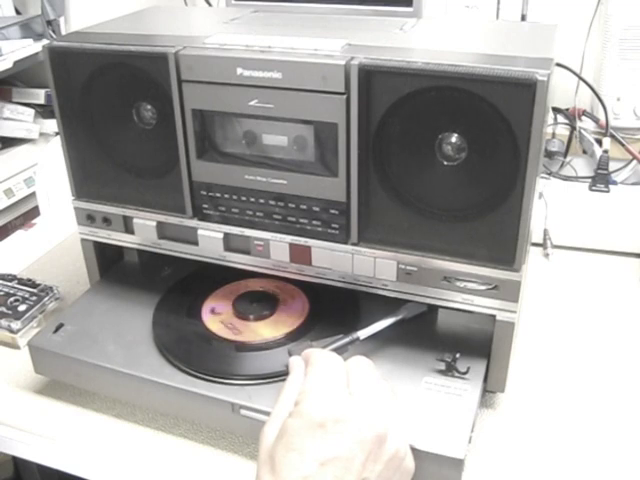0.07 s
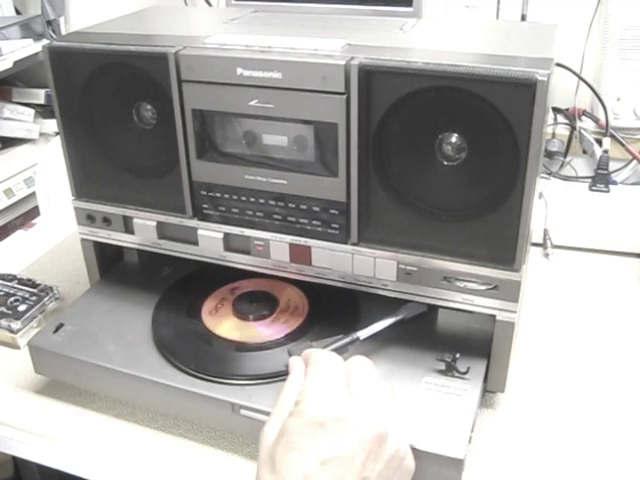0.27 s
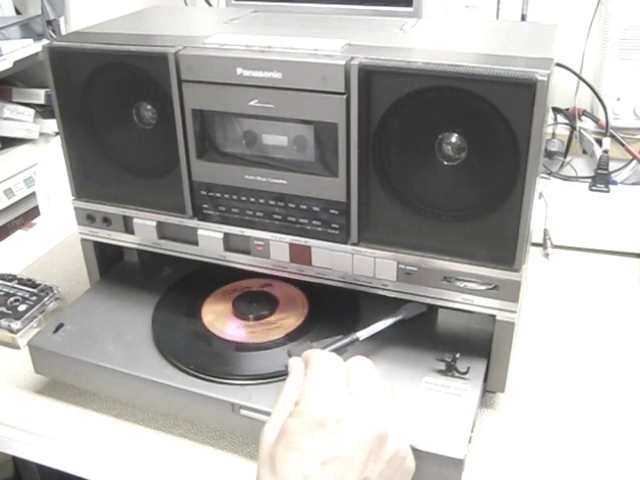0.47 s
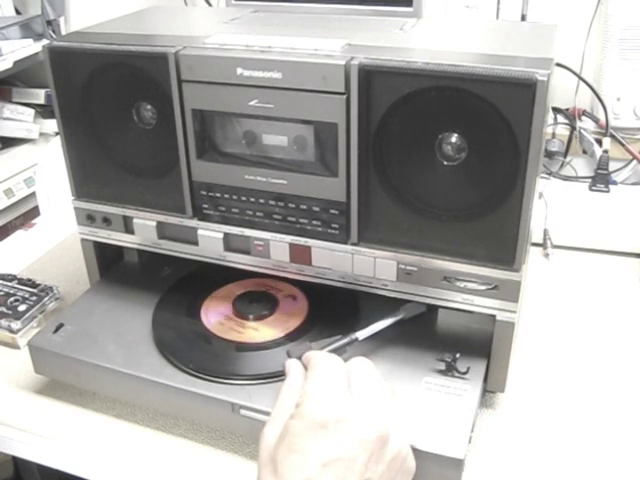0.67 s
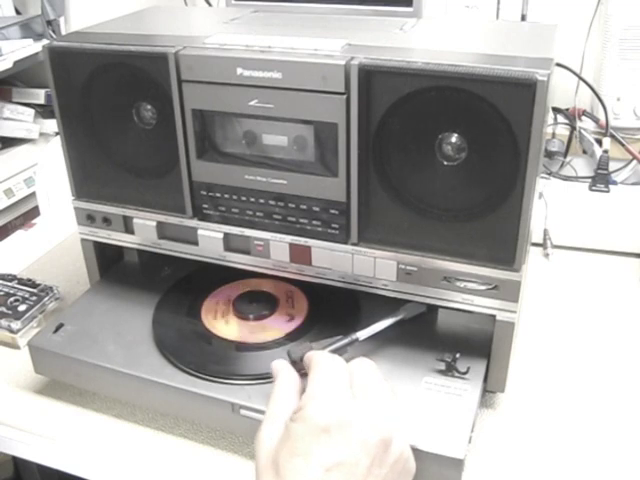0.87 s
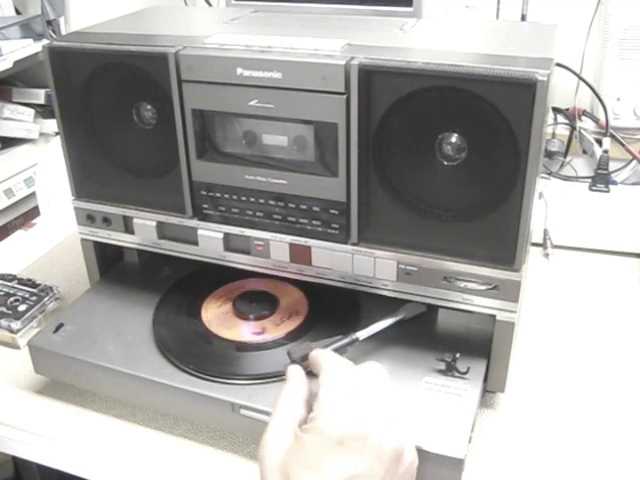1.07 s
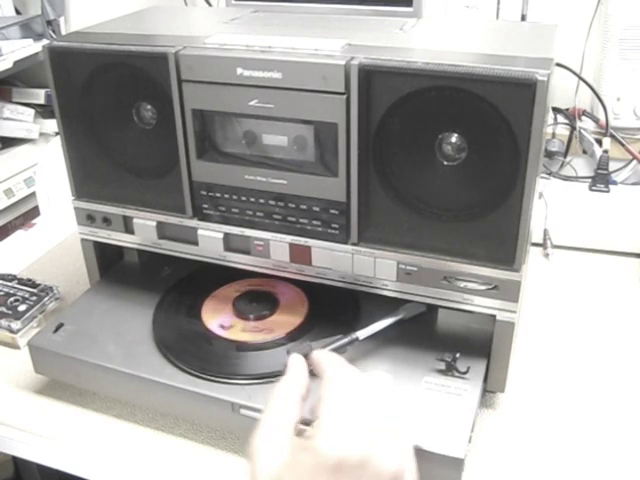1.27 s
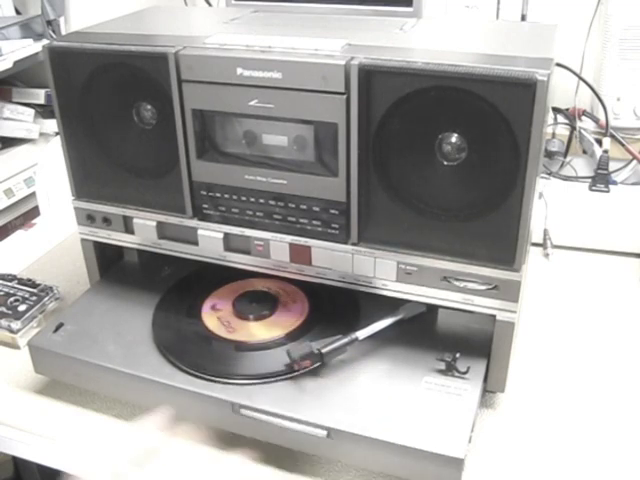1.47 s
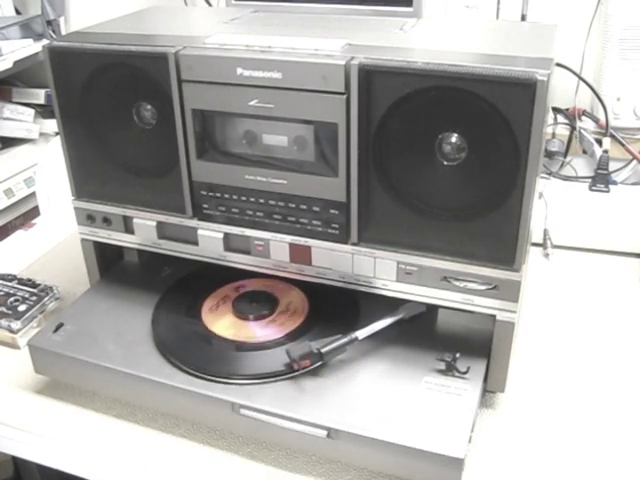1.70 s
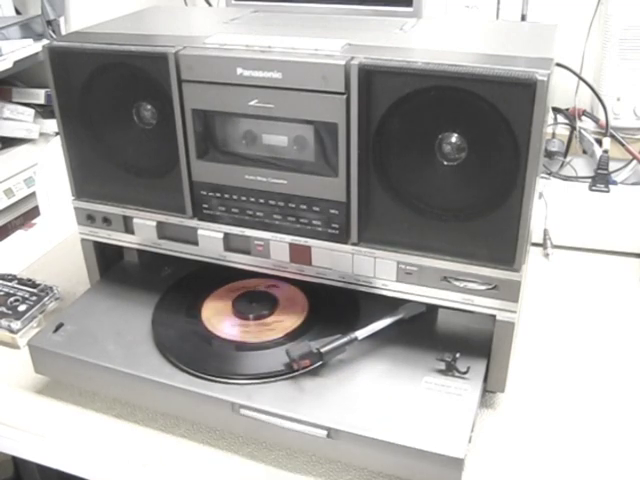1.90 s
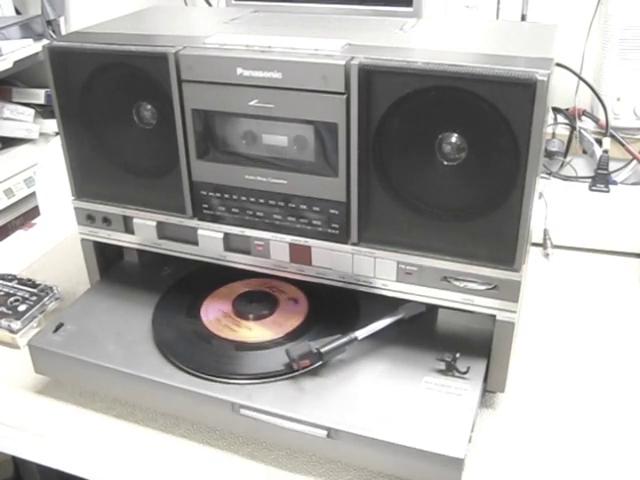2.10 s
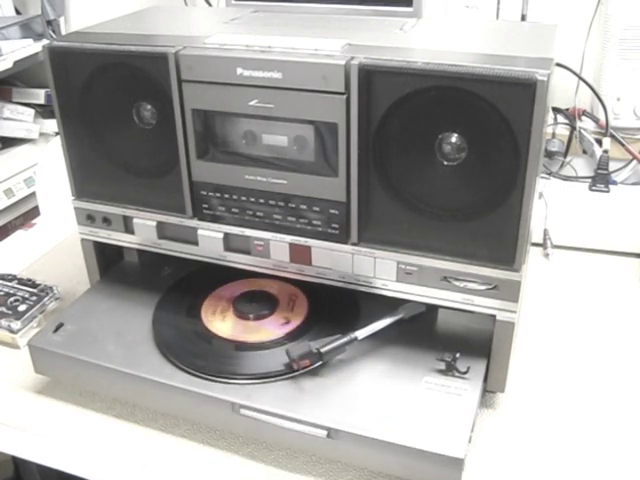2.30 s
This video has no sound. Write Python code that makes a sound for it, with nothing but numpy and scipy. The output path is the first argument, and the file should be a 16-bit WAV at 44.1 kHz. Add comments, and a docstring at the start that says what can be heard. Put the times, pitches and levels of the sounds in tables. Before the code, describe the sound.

A record player's tonearm is handled with short, hollow, raspy scrapes and light knocks, until the needle thumps down. Soft hiss, ticks and two low pops follow over a faint motor whine, heard up close in a small, quiet room.

```python
"""In a small room, fingertips drag along the tonearm of a portable record player. Stick-slip friction
excites the hollow arm, and the pickup passes the scraping to the loudspeaker. The stylus lands with
a thud, the hand lets go, and the lead-in groove hisses and pops. The motor whines faintly throughout,
and the recorder's gain control ducks after the loudest clicks."""
import sys
import numpy as np
from scipy import signal
from scipy.fft import rfft, irfft, next_fast_len
from scipy.io import wavfile
from scipy.ndimage import map_coordinates

SR = 44100
rng = np.random.default_rng(int(sys.argv[2]) if len(sys.argv) > 2 else 0)


def log_audio(samples):
    """Write samples as a 16-bit WAV file to the path given in sys.argv[1]."""
    # one column per channel
    frames = np.atleast_2d(samples).T
    # limit to full scale, then quantise
    limited = np.clip(frames, -1, 1)
    pcm = np.round(limited * 32767).astype(np.int16)
    wavfile.write(sys.argv[1], SR, pcm)


N = 108045
TIME = np.arange(N) / SR

# finger strokes on the arm: start_s, length_s, body_db, rasp_db
FINGER_STROKES = [(0.18, 0.06, -43, -41), (0.249, 0.068, -36, -41.5), (0.302, 0.057, -39.5, -44),
                  (0.363, 0.055, -30, -34.5), (0.39, 0.036, -32.5, -33), (0.427, .13, -31, -35.5),
                  (0.568, 0.045, -30, -36.5), (0.625, 0.019, -28.5, -33), (0.655, 0.064, -34, -40.5),
                  (0.712, 0.051, -29.5, -36), (0.776, 0.013, -27, -34.5), (0.795, 0.13, -42.5, -46),
                  (0.863, 0.1114, -29.5, -32)]
# broad response of the hollow arm: frequency_hz, relative_db
ARM_SPECTRUM = [(65, -54), (110, -30), (156, -22.5), (222, -10.5), (312, -2), (339, -6.5), (376, -8),
                (487, -3), (540, -16.5), (624, -11.5), (744, -1.5), (825, -8), (934, -10), (1030, -38),
                (1300, -38), (1690, -46), (2860, -120)]
# narrow resonances that the rubbing keeps ringing: pitch_hz, width_hz, relative_to_body_db
ARM_RESONANCES = [(331, 15, -11), (746, 6.1, -10.5), (1480, 10.4, -15.5), (2360, 25, -18), (3118, 17, -22)]
# skin friction: frequency_hz, relative_db
RASP_SPECTRUM = [(650, -36), (1100, -3), (1180, -17), (1230, 0), (1410, -9.5), (1520, 1), (1700, -0.5),
                 (2200, -2.5), (2360, -2.5), (2580, -1), (3260, 1), (3650, -5.5), (4360, -7.5), (4830, -16),
                 (5340, -12), (6240, -18), (7900, -15), (10800, -47), (14000, -28.5), (15000, -26),
                 (16000, -56)]
SLIPS_PER_S, SLIP_SPREAD_DB = 5000, 4.5
GRIP_SPREAD_DB, GRIP_CHANGES_PER_S = 0.87, 130

def finger_friction():
    """Stick-slip friction: tiny slips of the skin ring the arm's body and rasp in the treble."""
    grip = amp(GRIP_SPREAD_DB * wobble(GRIP_CHANGES_PER_S))
    friction = lambda: grip * impulse_train(SLIPS_PER_S, SLIP_SPREAD_DB)
    body_level = np.max([amp(db) * envelope(s, length) for s, length, db, _ in FINGER_STROKES], axis=0)
    rasp_level = np.max([amp(db) * envelope(s, length) for s, length, _, db in FINGER_STROKES], axis=0)
    ring = sum(amp(db) * resonant(friction(), hz, width) for hz, width, db in ARM_RESONANCES)
    body = coloured(friction(), ARM_SPECTRUM) + ring
    rasp = coloured(friction(), RASP_SPECTRUM)
    return body_level * body + rasp_level * rasp


# knocks on the arm, the last being the stylus landing: start_s, level_db, relative_bass_db
ARM_BUMPS = [(0.5711, -20.5, -35), (0.6589, -15, -25), (.782, -32, -30), (0.9805, -9.5, -7)]
# modes of the struck arm: pitch_hz, relative_db, t60_s
STRUCK_MODES = [(270, -12, 0.18), (335, 8.5, 0.037), (423, -8, 0.11), (597, 1.5, 0.022), (655, -6.5, 0.11),
                (920, -14, 0.075), (1427, 2, 0.016), (2680, -22, .005)]
SPEAKER_CUTOFF_HZ = 200

def arm_bumps():
    """Free vibration: each impact shoves the stylus and leaves the arm's damped modes ringing."""
    out, t = np.zeros(N), TIME[:SR // 8]
    ring = sum(amp(db - 60 * t / t60) * np.sin(2 * np.pi * hz * t) for hz, db, t60 in STRUCK_MODES)
    ring = signal.sosfilt(signal.butter(2, SPEAKER_CUTOFF_HZ, 'high', fs=SR, output='sos'), ring)
    ring /= np.abs(ring).max()
    for start, db, bass_db in ARM_BUMPS:
        add(out, start, -amp(db) * (ring + amp(bass_db) * shove(t)))
    return out


# catches on the arm, ticks and dust pops: start_s, tick_db, pop_db
STYLUS_CLICKS = [(0.1893, -21, -33), (.229, -28, -35), (0.3988, -27, -23), (0.66, -20, -31),
                 (0.7808, -22, -26), (0.9801, -22, -15.5), (1.0093, -18, -40), (1.141, -27, -42),
                 (1.153, -25, -49), (1.2794, -19, -22), (1.3003, -30, -35), (1.308, -29, -45),
                 (1.8654, -30.5, -7), (1.9815, -20, -27), (2.1817, -23.5, -10.5)]
# a full pop: frequency_hz, relative_db
POP_SPECTRUM = [(30, -38.5), (150, -11), (320, 0.5), (520, -1.5), (750, 5), (1100, -8), (1500, -0.5),
                (2700, -4), (3700, -17), (5500, -28.5), (7100, -30), (8300, -22), (9600, -37),
                (11000, -54.5), (13700, -32), (16000, -38)]
# a dry tick, also the grain of the groove's crackle: frequency_hz, relative_db
TICK_SPECTRUM = [(100, -29), (700, -7), (1200, -4.5), (1700, -1.5), (3200, 3), (4400, -6), (5500, -10),
                 (7000, -9.5), (8300, -20), (11000, -50), (14000, -23), (16000, -38)]
BASS_OFFSET_DB, BASS_DB_PER_POP_DB = -7.5, 2.38

def stylus_clicks():
    """Impulse response: a jolt of the stylus gives a tick, a pop and bass that outgrows the pop."""
    out, pop, tick = np.zeros(N), impulse(POP_SPECTRUM), impulse(TICK_SPECTRUM)
    bass = shove(TIME[:len(pop)])
    for start, tick_db, pop_db in STYLUS_CLICKS:
        bass_db = BASS_OFFSET_DB + BASS_DB_PER_POP_DB * pop_db
        click = amp(tick_db) * tick + amp(pop_db) * pop + amp(bass_db) * bass
        add(out, start, in_room(click))
    return out


# course of the surface noise: time_s, level_db
SURFACE_LEVELS = [(0, -47.5), (.95, -43), (1.2, -42.5), (1.4, -46.5), (1.62, -48), (1.78, -45), (2.0, -47),
                  (2.45, -46)]
# hiss and rumble: frequency_hz, relative_db
SURFACE_SPECTRUM = [(15, -22), (25, -16), (43, -21), (64, -7), (114, -14.5), (175, -10), (190, -6),
                    (242, -4), (277, -5.5), (416, -9), (476, -10.5), (516, -7.5), (624, -10), (677, -3),
                    (775, -9), (1230, -16), (1560, -13), (1890, -16.5), (2050, -15), (2220, -16.5),
                    (4870, -21.5), (9070, -37), (11000, -67), (12900, -46), (16000, -48)]
# the stylus scuffs as it finds the groove: start_s, length_s, level_db
STYLUS_SCUFFS = [(1.149, 0.04, -41), (1.268, .016, -40.5), (1.81, 0.03, -49.5), (1.902, 0.024, -42)]
# friction of a scuff: frequency_hz, relative_db
SCUFF_SPECTRUM = [(150, -17.5), (400, -4), (750, 3), (1200, -9), (3300, -8.5), (5500, -18.5), (8200, -26.5),
                  (11000, -50), (14000, -34), (16000, -40)]
CRACKLE_DB, CRACKLE_PER_S, CRACKLE_SPREAD_DB = -58, 200, 5

def groove_noise():
    """Surface roughness: hiss and rumble throughout; once the stylus is down, crackle and scuffs."""
    hiss_level = amp(np.interp(TIME, *np.transpose(SURFACE_LEVELS)))
    hiss = coloured(rng.standard_normal(N), SURFACE_SPECTRUM)
    stylus_down = TIME > ARM_BUMPS[-1][0]
    crackle = coloured(impulse_train(CRACKLE_PER_S, CRACKLE_SPREAD_DB), TICK_SPECTRUM)
    scuff_level = sum(amp(db) * envelope(start, length) for start, length, db in STYLUS_SCUFFS)
    scuff = coloured(impulse_train(SLIPS_PER_S, SLIP_SPREAD_DB), SCUFF_SPECTRUM)
    return hiss_level * hiss + amp(CRACKLE_DB) * stylus_down * crackle + scuff_level * scuff


# whine of the running motor: pitch_hz, level_db
MOTOR_TONES = [(119, -62), (685, -55.5), (2114, -55), (8909, -86), (13135, -89)]
# cabinet resonances: pitch_hz, width_hz, level_db
CABINET_MODES = [(198, 4.9, -60), (233, 8.9, -68), (704, 25, -63.5)]
WANDER_HZ, WAVER_DB = 2.83, 1.7

def motor():
    """Forced vibration: the motor whines unsteadily while the turntable's rumble rings the cabinet."""
    whine = np.zeros(N)
    for hz, db in MOTOR_TONES:
        level = amp(db + WAVER_DB * wobble(per_s=20))
        pitch_hz = hz + WANDER_HZ * wobble(per_s=30.34)
        whine += level * np.sin(2 * np.pi * np.cumsum(pitch_hz) / SR)
    drone = sum(amp(db) * resonant(rng.standard_normal(N), hz, width) for hz, width, db in CABINET_MODES)
    return whine + drone


# reverberation time of the room: frequency_hz, t60_s
ROOM_DECAY = [(150, 0.18), (700, 0.089), (2500, 0.091), (9000, 0.051)]
ROOM_DB, CABINET_DB, CABINET_T60_S = -7.5, -13, 0.012

def in_room(x):
    """Reverberation: the cabinet's short rattle and the room's tail follow the direct sound."""
    hz, frame_s, noise = signal.stft(rng.standard_normal(SR // 4), SR, nperseg=256)
    decay = amp(-60 * frame_s / along(ROOM_DECAY, hz)[:, None])
    tail = signal.istft(noise * decay, SR, nperseg=256)[1]
    t = TIME[:len(tail)]
    rattle = rng.standard_normal(len(t)) * amp(-60 * t / CABINET_T60_S) * (t > .0006)
    response = amp(ROOM_DB) * tail / np.linalg.norm(tail)
    response += amp(CABINET_DB) * rattle / np.linalg.norm(rattle)
    response[0] = 1  # direct sound
    return signal.fftconvolve(x, response)


def shove(t, rise_s=0.00059):
    """Critically damped pulse: one low push on the stylus, peak 1."""
    return t / rise_s * np.exp(1 - t / rise_s)


def envelope(start, length, attack_s=0.0067, release_s=0.0089):
    """Linear attack, hold, exponential release."""
    attack = np.clip((TIME - start) / attack_s, 0, 1)
    return attack * np.exp(-np.maximum(TIME - start - length, 0) / release_s)


def impulse_train(per_s, spread_db):
    """Poisson process: impulses of random sign and log-normal size."""
    occurs = rng.random(N) < per_s / SR
    return occurs * rng.choice([-1, 1], N) * amp(spread_db * rng.standard_normal(N))


def wobble(per_s):
    """Random modulation: a smooth curve through per_s random values a second."""
    return map_coordinates(rng.standard_normal(N), [TIME * per_s])


def resonant(x, hz, width):
    """Second-order resonance driven by x, at rms 1."""
    return unit_rms(filtered(x, lambda f: 1j * f * width / (hz * hz - f * f + 1j * f * width)))


def coloured(x, spectrum):
    """Convolution: x takes on the spectrum, at rms 1."""
    return unit_rms(signal.fftconvolve(x, impulse(spectrum))[:N])


def impulse(spectrum, size=4096):
    """Minimum-phase impulse with the given spectrum, peak 1."""
    magnitude = amp(along(spectrum, np.fft.rfftfreq(size, 1 / SR)))
    cepstrum = irfft(np.log(magnitude))
    cepstrum[1:size // 2] *= 2  # folding onto positive time makes it causal
    cepstrum[size // 2:] = 0
    pulse = irfft(np.exp(rfft(cepstrum)))
    return pulse / np.abs(pulse).max()


def filtered(x, response):
    """Linear filter: the spectrum of x times response(hz)."""
    size = next_fast_len(N + SR // 2)
    return irfft(rfft(x, size) * response(np.fft.rfftfreq(size, 1 / SR)), size)[:N]


def along(points, hz):
    """Interpolation of (frequency_hz, value) points on a log frequency axis."""
    frequencies, values = np.transpose(points)
    return np.interp(np.log(hz + 1), np.log(frequencies + 1), values)


def amp(db):
    return 10 ** (np.asarray(db) / 20)


def unit_rms(x):
    return x / np.sqrt(np.mean(x ** 2) + 1e-20)


def add(out, start_s, x):
    part = out[round(start_s * SR):][:len(x)]
    part += x[:len(part)]


def scene():
    """Superposition: the sources sum into one channel."""
    return (finger_friction() + arm_bumps() + stylus_clicks() + groove_noise() + motor())[None]


DUCK_ABOVE_DB, DUCK_SLOPE, DUCK_ATTACK_S, RECOVER_DB_PER_S = -13, 0.73, 0.027, 10
BAND_LIMIT_HZ = 16100

def record(dry):
    """Automatic gain control: the gain drops after a loud peak and creeps back; a low-pass follows."""
    x = dry[0]
    level_db = 20 * np.log10(np.abs(x) + 1e-9)
    cut_db = DUCK_SLOPE * np.maximum(level_db - DUCK_ABOVE_DB, 0)
    recovery_db = RECOVER_DB_PER_S * TIME
    held_db = np.maximum.accumulate(cut_db + recovery_db) - recovery_db
    pole = np.exp(-1 / (DUCK_ATTACK_S * SR))
    duck_db = signal.lfilter([1 - pole], [1, -pole], held_db)
    return filtered(x * amp(-duck_db), lambda hz: hz < BAND_LIMIT_HZ)[None]


dry = scene()
out = record(dry)
log_audio(out)
```